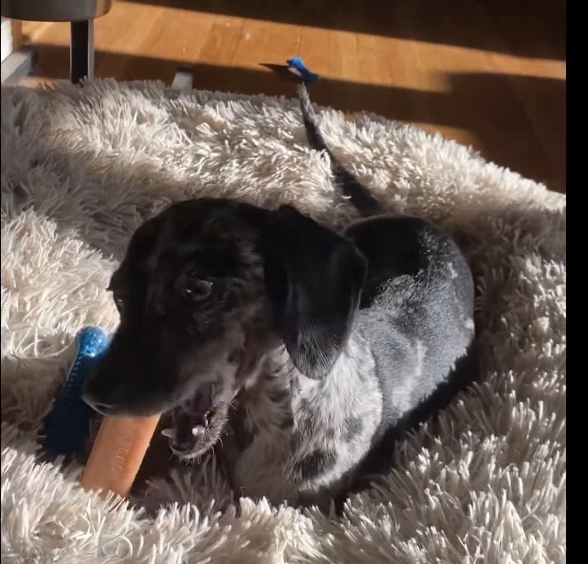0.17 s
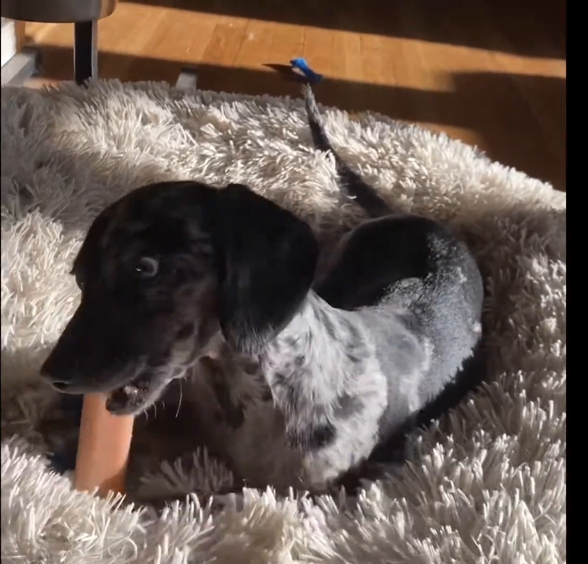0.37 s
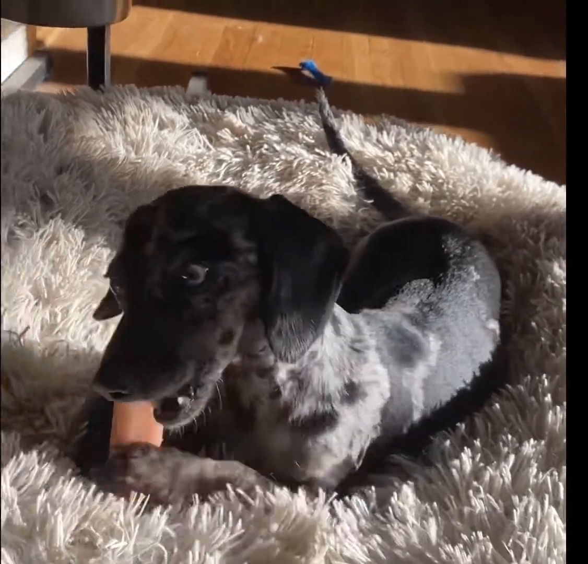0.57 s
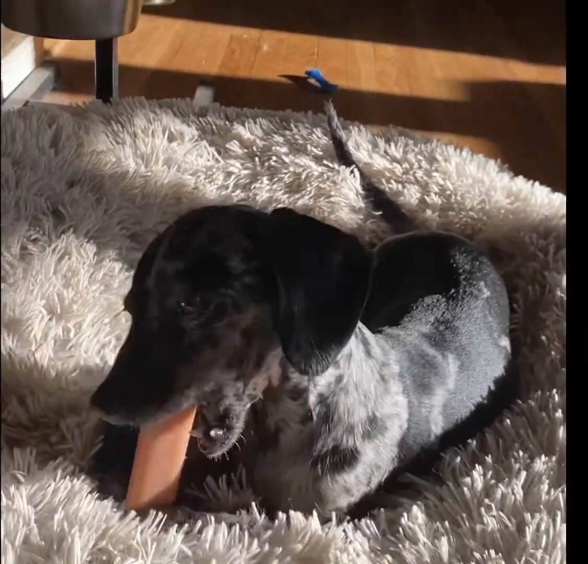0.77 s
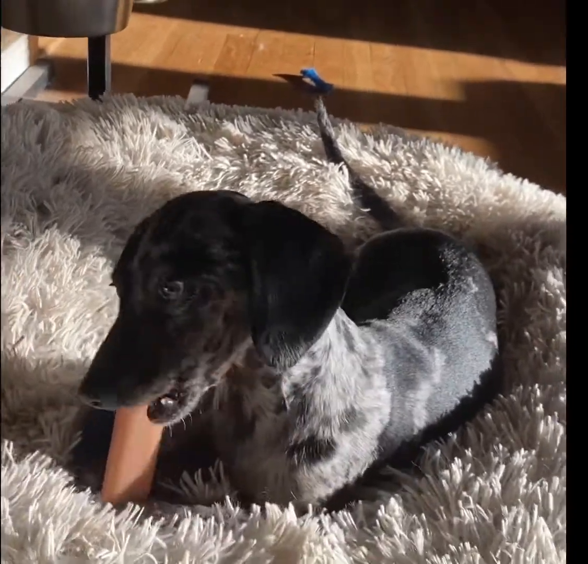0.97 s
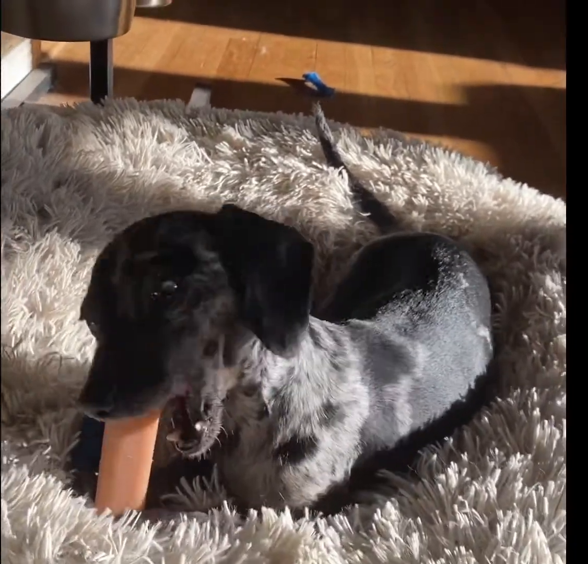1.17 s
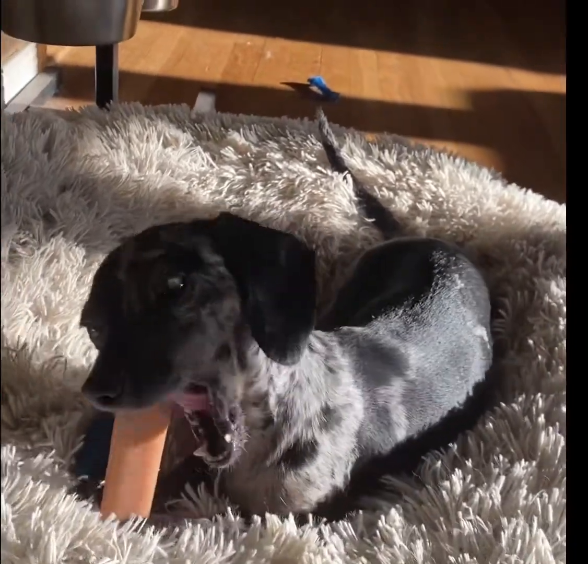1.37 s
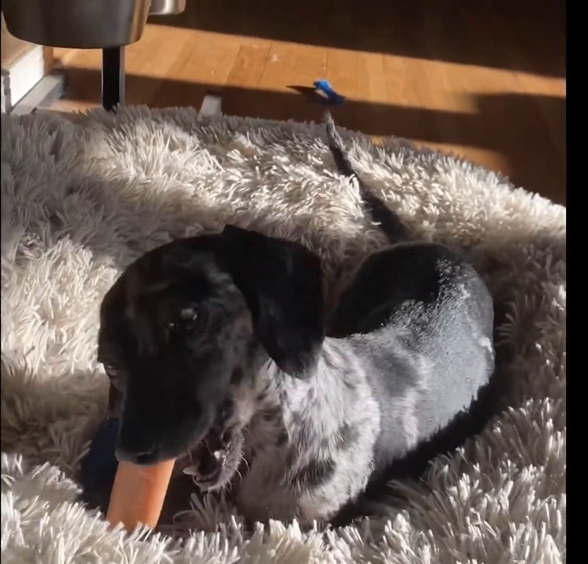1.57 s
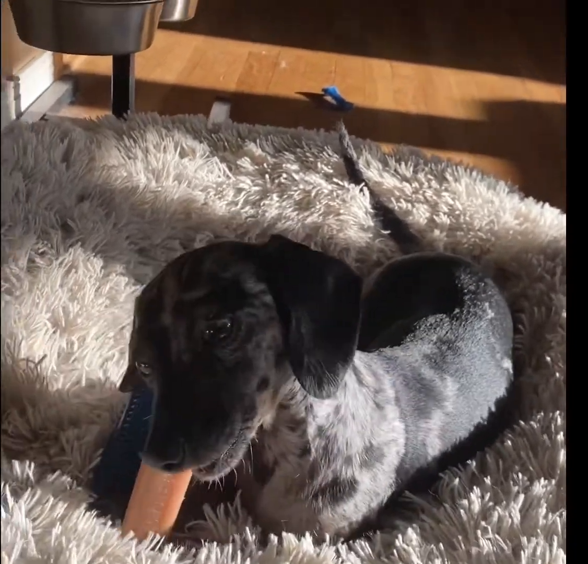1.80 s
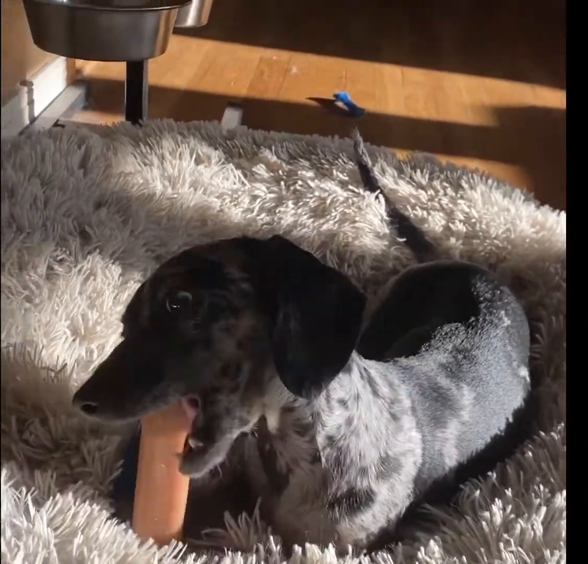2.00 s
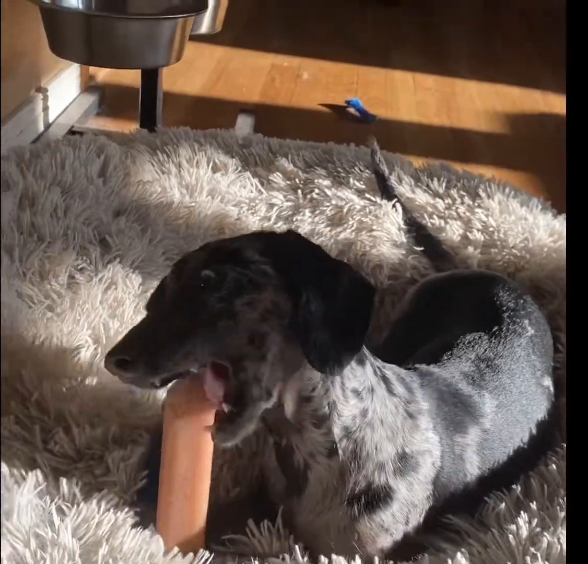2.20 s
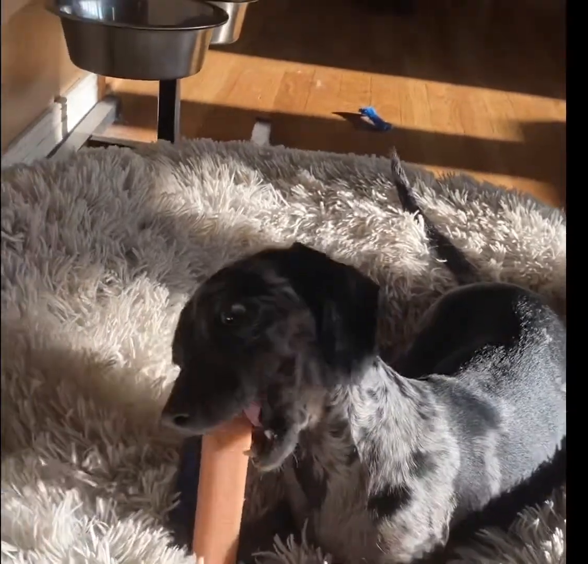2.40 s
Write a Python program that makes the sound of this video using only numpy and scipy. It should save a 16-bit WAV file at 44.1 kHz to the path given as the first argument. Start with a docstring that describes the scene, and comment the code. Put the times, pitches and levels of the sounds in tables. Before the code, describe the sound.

Sharp clicks and crunches of a dog chewing a bone, with an appliance droning behind.

```python
"""An appliance drones elsewhere in the house as a small dog on a thick rug, a metre from a phone, starts
to gnaw a hard chew. The chew fractures in short bursts of cracks that excite its resonances, and teeth
grind on it by friction. From 0.6 s the wet mouth pops too; the cracks crowd together and are loudest near
1.4 s. After a last strong bite near 1.9 s come fainter cracks and scrapes. Some cracks return an early
echo, the room rings briefly after each sound, and the drone lasts to the end."""
import sys
import numpy as np
from scipy import signal
from scipy.fft import rfft, irfft, next_fast_len
from scipy.io import wavfile
from scipy.ndimage import uniform_filter1d

SR = 44100
rng = np.random.default_rng(int(sys.argv[2]) if len(sys.argv) > 2 else 0)


def log_audio(samples):
    """Write samples as a 16-bit WAV file to the path given in sys.argv[1]."""
    # one column per channel
    frames = np.atleast_2d(samples).T
    # limit to full scale, then quantise
    limited = np.clip(frames, -1, 1)
    pcm = np.round(limited * 32767).astype(np.int16)
    wavfile.write(sys.argv[1], SR, pcm)


N = 107912


def undb(db):
    """Amplitude ratio: tenfold for every 20 dB."""
    return 10 ** (np.asarray(db) / 20)


def level(x, db):
    """Normalisation: scale x to an rms level of db."""
    return x * undb(db) / np.sqrt(np.mean(x ** 2))


def add(out, start_s, x):
    """Superposition: x adds to the sound already there."""
    i = int(start_s * SR)
    out[i:i + len(x)] += x[:N - i]


def colour(x, curve):
    """Spectral shaping: the gain follows (frequency_hz, gain_db) points on a log-frequency axis."""
    hz, db = np.array(curve).T
    size = next_fast_len(len(x) + 4096)
    bins_hz = np.fft.rfftfreq(size, 1 / SR) + 1
    gain = undb(np.interp(np.log(bins_hz), np.log(hz), db))
    return irfft(rfft(x, size) * gain, size)[:len(x)]


def bright(x, treble_db, corner_hz=6530):
    """Shelving filter: raise or lower the band above the corner."""
    treble = signal.filtfilt(*signal.butter(2, corner_hz, "high", fs=SR), x)
    return x + (undb(treble_db) - 1) * treble


def ring(x, hz, width_hz):
    """Resonance: one damped mode driven by x, with gain 1 at its centre."""
    return signal.lfilter(*signal.iirpeak(min(hz, .45 * SR), hz / width_hz, fs=SR), x)


def flutter(depth_db, size, smooth_samples):
    """Random amplitude modulation: a gain that wanders by depth_db rms."""
    return undb(depth_db * level(uniform_filter1d(rng.standard_normal(size), smooth_samples), 0))


def grit(per_s, scatter_db, size):
    """Shot noise: tiny breaks at random moments, a few much bigger than the rest; rms 1."""
    chance, polarity, rarity = rng.random((3, size))
    strength = undb(-scatter_db * np.log(rarity + 1e-3))
    impulses = (chance < per_s / SR) * np.sign(polarity - .5) * strength
    return level(impulses + 1e-9, 0)


def appliance(drum_hz=12.393, thump_s=.073, scatter_turns=.09, throb_db=1):
    """Periodic forcing: a drum thumps once a turn, over motor tones, casing resonances and moving air."""
    # Harmonics of the turning rate: multiple, level_db
    drum_harmonics = [(3, -65), (4, -55), (5, -47), (6, -51), (7, -54), (8, -57), (9, -51), (11, -60),
                      (12, -62), (13, -55), (14, -59), (15, -61), (16, -69), (17, -61), (18, -65),
                      (20, -65), (22, -66), (23, -69), (24, -59), (25, -65), (26, -64), (27, -69),
                      (31, -69), (34, -68), (39, -77), (46, -75), (50, -76)]
    # Steady motor tones: pitch_hz, level_db
    motor_tones = [(120, -56), (240, -62), (325, -57)]
    # Resonances of the casing: pitch_hz, width_hz, level_db
    casing_modes = [(83.2, 4.8, -53.5), (325.6, 18, -63), (422.4, 12, -65.5), (592, 44, -68)]
    # Spectrum of the moving air: frequency_hz, gain_db
    air_spectrum = [(25, -16), (42, -8.5), (55, -6), (80, -0.5), (105, -4.5), (150, -11), (260, -10.5),
                    (310, -8), (460, -20.5), (700, -22.5), (900, -27.5), (1500, -34.5), (4000, -38),
                    (6500, -44.5), (10000, -48.5), (14000, -59)]
    t = np.arange(N) / SR
    turns = drum_hz * (t - thump_s)
    drum = sum(undb(db) * np.cos(2 * np.pi * multiple * (turns + scatter_turns * (rng.random() - .5)))
               for multiple, db in drum_harmonics)
    motor = sum(undb(db) * np.cos(2 * np.pi * (hz * t + rng.random())) for hz, db in motor_tones)
    casing = sum(level(ring(rng.standard_normal(N), hz, width), db) for hz, width, db in casing_modes)
    air = level(colour(rng.standard_normal(N), air_spectrum), db=-48.5)
    low_air = signal.lfilter(*signal.butter(2, 400, fs=SR), air)
    throb = low_air * (undb(throb_db * np.cos(2 * np.pi * turns)) - 1)  # the air swells with each turn
    return np.sqrt(2) * (drum + motor) + casing + air + throb


def room(x, gain_db=-9.5, rise_ms=12, band_q=2.04):
    """Reverberation: a diffuse tail decays exponentially in each band, sooner in the treble."""
    # Decay of the room: frequency_hz, t60_s, level_db
    room_decay = [(1000, 0.52, 1.5), (2730, 0.48, -1.5), (4730, 0.46, 2.5), (10000, 0.11, -6),
                  (16000, 0.34, 1)]
    hz, t60_s, db = np.array(room_decay).T
    t, tail = np.arange(int(.7 * SR)) / SR, 0
    for centre_hz in 500 * 2 ** np.arange(0, 5.1, .5):  # half-octave bands
        band = ring(rng.standard_normal(len(t)), centre_hz, centre_hz / band_q)
        decay = undb(np.interp(centre_hz, hz, db) - 60 * t / np.interp(centre_hz, hz, t60_s))
        tail = tail + band * decay
    tail *= np.minimum(t * 1000 / rise_ms, 1)
    tail *= flutter(1.2, len(t), smooth_samples=150)  # walls and furniture return the sound in clumps
    tail /= np.sqrt(np.sum(tail ** 2))
    return signal.fftconvolve(x, tail)[:N] * undb(gain_db)


def pops(rise_cycles=1.75, roughness=.3, gain_db=-3):
    """Damped oscillation: each pop of the wet mouth is a few rough cycles that swell fast and fade."""
    # Pops of the mouth: start_s, level_db, pitch_hz
    mouth_pops = [(0.6403, -40.5, 1470), (0.7836, -45.5, 1600), (1.042, -43, 1770), (1.1148, -37.5, 1295),
                  (1.4313, -46.5, 1610), (1.5414, -45.5, 970), (1.6952, -48, 1850), (1.806, -49.5, 1810),
                  (2.1082, -49, 1620)]
    out, t = np.zeros(N), np.arange(SR // 50) / SR
    for start_s, db, hz in mouth_pops:
        age = t * hz / rise_cycles
        envelope = age * np.exp(1 - age)
        noise = level(ring(rng.standard_normal(len(t)), hz, width_hz=hz), db=3)
        wet = np.sin(2 * np.pi * hz * t) + roughness * noise
        add(out, start_s, undb(db + gain_db) * envelope * wet)
    return out


def grinding(scrape_q=1.02):
    """Friction noise: teeth and tongue slide on the chew, making fluttering grit that swells and fades."""
    # Scrapes of teeth on the chew: start_s, length_s, level_db, centre_hz, treble_db
    scrapes = [(0.016, 0.11, -55.5, 1900, 7), (0.076, 0.25, -60.5, 2700, 7.5),
               (1.011, 0.035, -55.5, 4400, -12), (1.9, 0.14, -65, 8300, 10), (1.12, 0.25, -54.5, 2500, 1),
               (1.83, 0.04, -64, 3100, 11.5), (2.06, 0.11, -56.5, 2150, -11),
               (2.267, 0.096, -60.5, 2500, -1), (2.326, 0.042, -52, 4700, 1), (2.353, 0.05, -49, 5300, 6.5),
               (2.34, 0.19, -63.5, 3570, 7), (0.34, 0.21, -60, 4200, 5.5), (0.63, 0.1, -59, 3600, 7.5),
               (1.686, 0.097, -61, 2600, 5)]
    out = np.zeros(N)
    friction = grit(per_s=7500, scatter_db=2.8, size=N + SR)
    friction *= flutter(2.4, N + SR, smooth_samples=200)
    for start_s, length_s, db, hz, treble_db in scrapes:
        swell = np.hanning(int(length_s * SR))
        stroke = friction[int(start_s * SR):][:len(swell)] * swell
        rasp = .5 * bright(stroke, treble_db) + 2 * ring(stroke, hz, hz / scrape_q)
        add(out, start_s, undb(db) * rasp)
    return out


def cracks(rise_ms=.51, fade_ms=1.4, ring_q=10, ring_db=8.5, gain_db=-7.5):
    """Brittle fracture: a flurry of splits holds, then dies, ringing chew and mouth; some cracks echo."""
    # Cracks of the chew, and early room echoes about 14 ms after some of them:
    # start_s, level_db, ring_hz, knock_hz, knock_db, treble_db, length_ms
    cracks_and_echoes = [(0.0204, -54, 5670, 2140, 8.5, 16, 1.8), (0.04, -52.5, 4470, 2170, 18, 5, 4.8),
                         (0.0524, -31.5, 4040, 2870, 7.5, 1.5, 2.5),
                         (0.067, -40.5, 4110, 2250, 5.5, 2, 2.3), (0.1327, -48, 3380, 1620, 12, 1, 3.5),
                         (0.166, -36.5, 5770, 2380, -6, 5.5, 2), (0.1717, -42, 4370, 1280, -2, 0, 2),
                         (0.3615, -26, 5500, 2800, 2, 7, 1.55), (0.365, -27.5, 4800, 2230, 4, 4.5, 3.4),
                         (0.6275, -32.5, 5030, 2960, 4, 3.5, 5), (0.6379, -28, 4700, 2000, 0, 5, 2.2),
                         (0.751, -49.5, 3240, 2250, 16, -15, 3.4), (0.7827, -50, 4300, 2850, 16, 2, 3.3),
                         (0.8234, -49, 4300, 2300, -4, 4, 5.3), (0.912, -44.5, 4600, 1090, -8, -6, 4.1),
                         (0.9177, -47, 4450, 2520, -11, -7, 1.5),
                         (0.9504, -41.5, 4900, 2820, -21, 13.5, 2.2),
                         (0.955, -38.5, 4660, 1100, -26, 1, 2.8), (0.9646, -57, 3920, 1320, -4, 4, 2.5),
                         (0.9892, -47.5, 4540, 2400, -6, 2, 6.8), (1.0253, -44, 3480, 1370, 16, -2, 2),
                         (1.1135, -30, 5600, 4200, 3, 14.5, 2.1), (1.1195, -38.5, 5480, 1880, 3, 5, 1.5),
                         (1.1258, -45, 5510, 2780, 4, -8, 2.5), (1.1542, -37, 3940, 1700, 5.5, -3, 3.9),
                         (1.174, -36.5, 4830, 2850, 4.5, 1, 4), (1.2455, -45, 5700, 2900, -5, 2, 4.7),
                         (1.2513, -39, 3520, 2750, -16, 0, 3), (1.3234, -43, 3720, 1100, 10.5, -13, 2.8),
                         (1.3542, -26.5, 3780, 2570, -1, 10.5, 3.8),
                         (1.3596, -23, 5200, 3100, -2.5, -1, 4.1), (1.364, -36, 4760, 2830, -13, -4, 2),
                         (1.3685, -37, 4700, 2520, -3, 6, 1.5), (1.39, -44, 4000, 3100, 7, 3, 1.8),
                         (1.4049, -40.5, 5160, 3100, -12, 10, 3.8), (1.4916, -40, 3720, 1614, -4, -5, 3.2),
                         (1.514, -37.5, 3800, 2200, -7, -4, 3.6), (1.5684, -42.5, 3660, 2480, -2, -2, 3),
                         (1.6936, -37.5, 4670, 2840, -3, 1, 4.3), (1.6958, -42, 4450, 2830, 1, 7, 7.9),
                         (1.8437, -56, 3696, 1310, -5, 2, 2), (1.9379, -31.5, 4500, 3250, -9, 12, 1.14),
                         (1.942, -35.5, 3750, 2620, -4, 7, 3.4), (2.0935, -50, 6000, 1400, 3, -8, 1.3),
                         (2.106, -51.5, 3020, 1720, 19, -4, 2.3), (2.1155, -51, 3900, 2700, 15, -12, 1.1),
                         (2.128, -49, 3300, 1890, 13, -12, 1.9), (2.221, -44.5, 4450, 1100, 3, 5.5, 0.73),
                         (2.2848, -52, 3860, 2650, 10.5, -12, 2.1),
                         (2.3147, -45.5, 3670, 2220, 13, -7, 1.4), (2.4394, -48, 4840, 2960, -13, -5, 5.5)]
    # Modes of the chew, excited by every crack: pitch_hz, width_hz, level_db
    chew_modes = [(1760, 67, -3), (2564, 100, 1.5), (2920, 83, 7), (3745, 61, -2.5), (4500, 54, 0),
                  (4865, 50, 4), (5250, 137, 3)]
    grip_db, grip_bend = 2.5, .012  # each bite's grip shifts the modes' levels and pitches its own way
    out, ms = np.zeros(N), np.arange(SR // 25) * 1000 / SR
    for start_s, db, ring_hz, knock_hz, knock_db, treble_db, length_ms in cracks_and_echoes:
        envelope = np.minimum(ms / rise_ms, 1) * np.exp(-np.maximum(ms - length_ms, 0) / fade_ms)
        splits = grit(per_s=9000, scatter_db=1.7, size=len(ms)) * envelope
        splits = level(splits, 0) * np.sqrt(np.mean(envelope ** 2))  # the envelope sets the energy
        hollow_knock = undb(knock_db) * ring(splits, knock_hz, knock_hz / ring_q)
        ringing = ring(splits, ring_hz, ring_hz / ring_q) + hollow_knock
        grip = rng.standard_normal((len(chew_modes), 2))
        body = sum(undb(mode_db + grip_db * lift) * ring(splits, hz * (1 + grip_bend * bend), width_hz)
                   for (hz, width_hz, mode_db), (lift, bend) in zip(chew_modes, grip))
        burst = bright(splits, treble_db) + undb(ring_db) * ringing + body
        add(out, start_s, undb(db + gain_db) * burst)
    return out


def sound_field():
    """Superposition: the dog's gnawing, its reverberation and the appliance add together."""
    # Tone colour of the chew: frequency_hz, gain_db
    chew_spectrum = [(500, -2), (1100, -2.5), (1700, -4.5), (2600, -0.5), (3500, -4), (5200, -4), (7500, 0),
                     (10000, -2.5), (12500, -7), (16000, -19.5)]
    dog = colour(cracks() + grinding(), chew_spectrum) + pops()
    return dog + room(dog) + appliance()


def scene():
    """Partial coherence: the phone's two ports get one field alike and a second with opposite signs."""
    # Spectrum of the field the ports do not share: frequency_hz, gain_db
    unshared_spectrum = [(25, -41), (110, -64), (200, -20), (380, -13), (700, -5), (1300, -5.5),
                         (1800, -13), (3300, -5), (4600, -1.5), (5600, 1), (7200, -21.5), (10500, -42),
                         (13600, -8), (16000, -18)]
    # Phase by which the left port leads the right: frequency_hz, lead_rad
    port_lead = [(0, 0), (2200, .3), (3300, .9), (4600, .6), (5400, .7), (6900, 2.9), (7400, 3.2),
                 (10500, 6.2), (13600, 9.4), (16800, 12.6)]
    shared, unshared = sound_field(), colour(sound_field(), unshared_spectrum)
    size = next_fast_len(N + 4096)
    hz, lead_rad = np.array(port_lead).T
    half_lead = np.exp(.5j * np.interp(np.fft.rfftfreq(size, 1 / SR), hz, lead_rad))
    left = rfft(shared + unshared, size) * half_lead
    right = rfft(shared - unshared, size) / half_lead
    return irfft(np.array([left, right]), size)[:, :N]


def record(dry, cutoff_hz=16300):
    """Band limiting: the phone's steep low-pass filter cuts the highest treble."""
    return signal.sosfilt(signal.ellip(8, .2, 70, cutoff_hz, fs=SR, output="sos"), dry)


dry = scene()
out = record(dry)
log_audio(out)
```